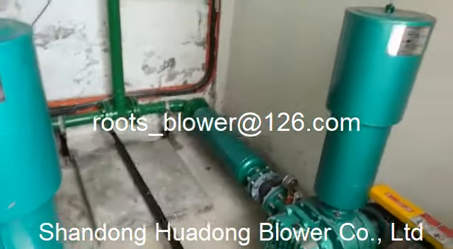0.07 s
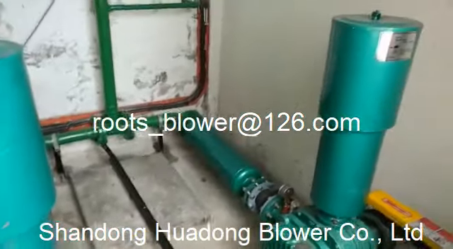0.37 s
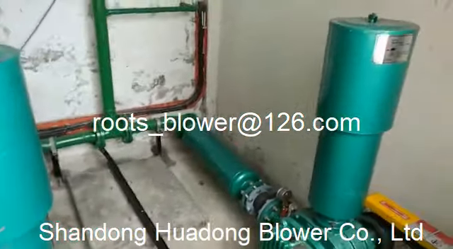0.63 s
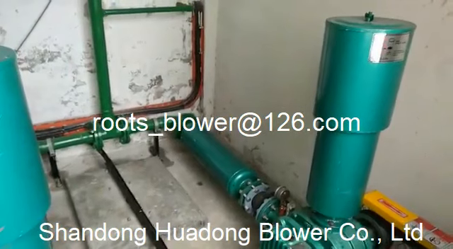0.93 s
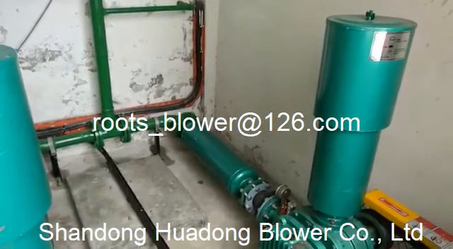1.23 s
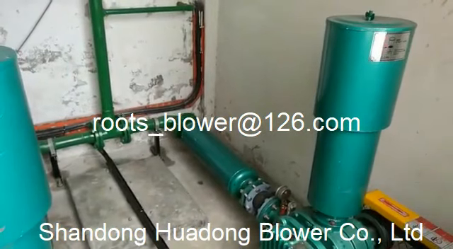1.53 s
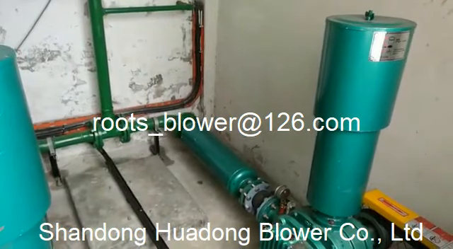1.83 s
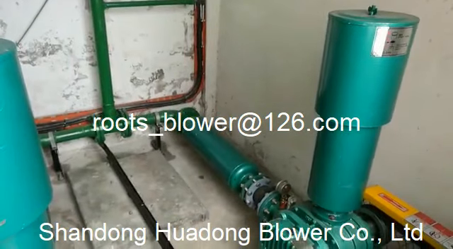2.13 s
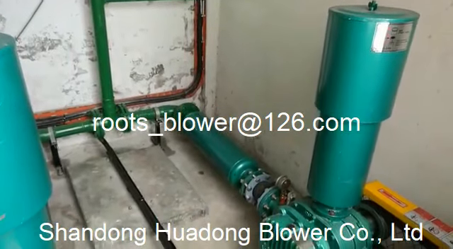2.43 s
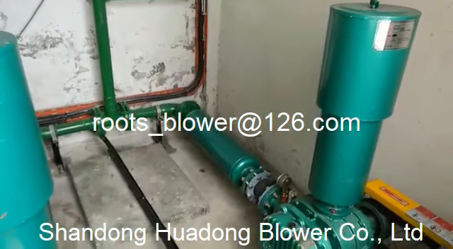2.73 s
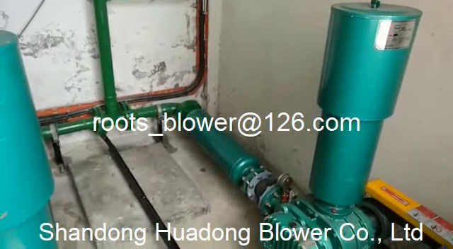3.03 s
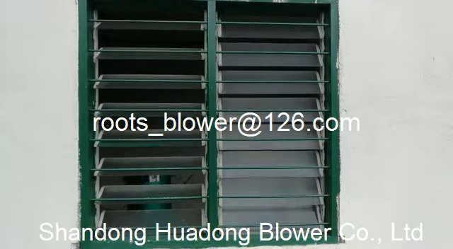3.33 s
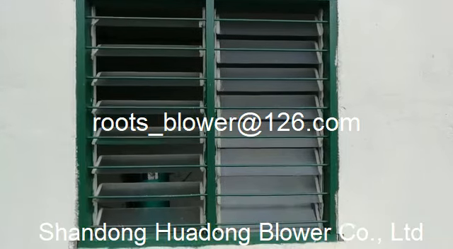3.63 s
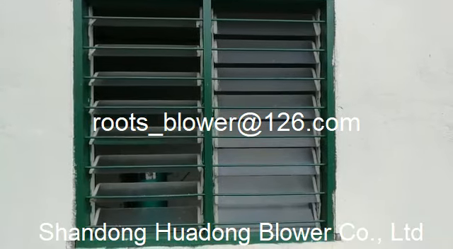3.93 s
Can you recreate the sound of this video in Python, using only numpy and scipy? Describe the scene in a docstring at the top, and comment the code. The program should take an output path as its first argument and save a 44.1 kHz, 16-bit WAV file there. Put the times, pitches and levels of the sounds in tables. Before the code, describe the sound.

Loud, steady industrial blower drone with gear whine, suddenly fainter when heard through a window.

```python
"""A three-lobe rotary air blower drones at constant speed in a concrete plant room.
Six puffs of air a turn form a periodic pressure wave, heard as the drone. The meshing timing gears
whine, modulated by the drive belt; the motor hums, the casing rattles alike on every turn, and air
rushes in the pipes. The machine is heard first from close by, then abruptly from outside a louvred
window, where it is far quieter."""
import sys
import numpy as np
from scipy import signal
from scipy.fft import irfft
from scipy.io import wavfile
from scipy.ndimage import uniform_filter1d

SR = 44100
rng = np.random.default_rng(int(sys.argv[2]) if len(sys.argv) > 2 else 0)


def transcribe(signal):
    """Save signal, clipped to [-1, 1], as a 16-bit WAV file at the path in sys.argv[1]."""
    frames = np.atleast_2d(signal).T
    limited = np.clip(frames, -1, 1)
    pcm = np.round(limited * 32767).astype(np.int16)
    wavfile.write(sys.argv[1], SR, pcm)


N = 176400

# Partials of the air pulsation, in the room and through the window:
# shaft multiple, left level/dB, right level/dB, interaural correlation (-1..1)
PUFF_PARTIALS_INSIDE = [(3, -34.0, -33.5, 0.99), (6, -22.0, -21.5, 0.96), (7, -45.0, -46.5, 0.75),
                        (8, -41.5, -41.5, 0.92), (9, -43.5, -42.5, 0.77), (10, -45.5, -45.0, 0.81),
                        (11, -45.0, -46.5, 0.68), (12, -30.5, -29.5, 0.56), (18, -45.5, -48.0, -0.2),
                        (24, -40.0, -47.5, -0.43), (27, -43.0, -58.5, 0.46), (30, -47.0, -44.5, 0.48),
                        (33, -46.0, -45.5, -0.25), (36, -33.5, -38.0, 0.42), (39, -47.5, -36.0, -0.83),
                        (42, -32.0, -31.5, -0.65), (45, -34.0, -36.5, -0.8), (48, -31.5, -30.0, -0.49),
                        (51, -36.0, -44.0, -0.95), (54, -37.5, -40.0, 0.93), (60, -42.5, -47.5, -0.84),
                        (63, -51.0, -42.5, -0.44), (69, -48.0, -44.0, -0.2)]
PUFF_PARTIALS_OUTSIDE = [(3, -53, -53, 1.0), (6, -40, -39.5, 0.98), (9, -53, -52, 0.99),
                         (10, -58, -58.5, 0.97), (12, -52.0, -50.0, 0.98), (24, -54.0, -57.5, 0.53),
                         (30, -54, -54.5, 0.77), (39, -54.5, -53.0, 0.77), (42, -52.5, -51.0, -0.64),
                         (45, -54, -49.5, 0.89), (48, -39.3, -37.3, 0.98), (54, -47.5, -53.0, 0.91),
                         (57, -51.5, -51, 0.97)]
# Mesh tones and sidebands of the timing gears, in the room and through the window: same columns
GEAR_PARTIALS_INSIDE = [(57, -33.0, -46.0, 0.68), (103, -35.5, -33.5, 0.35), (105, -27.0, -27.5, 0.72),
                        (106, -36.0, -38.5, -0.84), (108, -38.0, -39.5, 0.94), (109, -45.5, -37.5, 0.54),
                        (110, -38.0, -35.5, 0.39), (112, -34.5, -30.5, -0.26), (113, -27.0, -27.0, -0.04),
                        (114, -22.0, -23.0, -0.86), (115, -23.5, -22.5, -0.96), (116, -29.5, -32.0, 0.83),
                        (117, -33.0, -32.5, -0.2), (118, -44.0, -36.5, -0.31), (119, -35.5, -38.0, -0.63),
                        (120, -39.5, -41.5, -0.14), (123, -41.0, -32.5, 0.73), (124, -37.5, -36.0, -0.03),
                        (125, -45.0, -32.0, -0.12), (128, -46.0, -37.0, 0.36), (148, -42.5, -43, 0.4),
                        (150, -41.5, -41, 0.4), (153, -44.0, -42.0, 0.86), (155, -43.0, -36.5, 0.82),
                        (160, -47.0, -33.5, -0.18), (168, -42, -46, -0.1), (169, -41.0, -47.5, 0.72),
                        (171, -32.5, -38.5, -0.96)]
GEAR_PARTIALS_OUTSIDE = [(103, -46.0, -51.0, -0.31), (105, -43.0, -56.0, 0.47), (106, -46.0, -53.5, 0.16),
                         (107, -50, -65, 0.1), (112, -49.0, -52.0, -0.44), (113, -46.5, -51.0, 0.52),
                         (114, -47.0, -50.5, 0.56), (115, -38.5, -44.5, -0.67), (116, -47.0, -52.5, 0.97),
                         (123, -45.0, -50.5, -0.2), (128, -52.5, -56.5, -0.17)]
# Slow rise and fall of the gear whine in the room: t/s, gain/dB
WHINE_ENVELOPE = [(0.0, -0.5), (1.6, 0.2), (3.16, -0.97)]
# Motor hum and whine: f/Hz, level/dB
MOTOR_TONES = [(300.3, -42.5), (679.3, -52), (866.3, -44.5)]
# Spectral envelope of the casing's shaft harmonics: f/Hz, inside level/dB, outside level/dB
RATTLE_SPECTRUM = [(45, -62, -66.0), (110, -48, -61), (335, -56.5, -77), (553, -80, -65.5),
                   (770, -55, -64.5), (1130, -52.5, -63), (1586, -49, -64), (1944, -58.5, -73),
                   (2240, -45, -63), (2540, -65, -56), (3070, -54, -61.5), (3290, -50, -71),
                   (3380, -46.5, -59), (3790, -57, -63.5), (3820, -49, -59), (4110, -55.5, -78),
                   (4600, -70, -84), (5190, -60.5, -74.5), (5540, -75, -88), (6500, -67, -81.5),
                   (7350, -80, -96)]
# Spectral density of the rushing air: f/Hz, inside level/dB, outside level/dB (in a 1 Hz band)
AIR_SPECTRUM = [(15, -85, -85), (45, -65, -68), (62, -67, -80), (77, -60, -60), (100, -68, -73),
                (120, -61, -69), (217, -64.5, -75), (416, -71.5, -77), (637, -74, -78.5),
                (785, -61.5, -77.5), (1190, -65, -71.5), (1970, -68, -83.5), (2390, -61, -68),
                (2720, -53, -86), (2900, -58.5, -75), (3130, -60.5, -84), (3670, -59.5, -75),
                (3630, -65.5, -87), (4500, -76.5, -95), (5300, -72.5, -89.5), (5560, -77, -93.5),
                (7300, -80.5, -97.5), (9700, -82.5, -97), (15000, -82.5, -101.5)]
# Likeness of the two ears in the diffuse field: f/Hz, coherence (0..1)
EAR_COHERENCE = [(60, 0.9), (180, 0.94), (350, 0.33), (700, 0.1), (2500, .02)]
# Left minus right for air and rattle: f/Hz, inside balance/dB, outside balance/dB
EAR_BALANCE = [(200, -2, 2.5), (1220, -0.5, 0), (2560, 3.5, 0.5), (4200, 3, 5), (8000, 1.5, -1),
               (15000, 2.5, 6)]
# Overall gain outside, stepping up a little near the end: t/s, gain/dB
OUTSIDE_ENVELOPE = [(3.17, 0.5), (3.80, 0.1), (3.83, 2.6), (4.0, 2.5)]

INSIDE, OUTSIDE = 0, 1  # index into each pair of settings
OUTSIDE_FROM_S, TOP_HZ = 3.162, 15750
SHAFT_HZ, SHAFT_WANDER_TURNS, PUFFS_PER_TURN = 22.593, 0.00028, 6
BELT_HZ = 10.0  # laps of the drive belt per second
SWEEP_TURNS = 0.125  # group delay per shaft multiple: the whine surges and sweeps upward once a turn
SWAY_DB_PER_KHZ, SWAY_HZ = 0.6, 1.57  # tones swell as the microphone sways through standing waves
PUFF_DB, RATTLE_DB, AIR_DB = (-0.02, 0.4), (-0.35, 0.3), (-1, -1.1)  # gains on the tabulated levels
GEARS_OUTSIDE_DB = -0.5
PUFF_WAVER, GEAR_WAVER, RATTLE_WAVER = (0.0078, 0.097), 0.081, 0.36  # share of each tone that wanders


def lobe_drone(t, turns, place):
    """Periodic displacement: the lobes expel air in puffs, six to each turn of the shaft."""
    partials = (PUFF_PARTIALS_INSIDE, PUFF_PARTIALS_OUTSIDE)[place]
    drone = shaft_tones(partials, t, turns, PUFF_WAVER[place], waver_hz=12, belt_depth=0.028)
    return undb(PUFF_DB[place]) * drone


def gear_whine(partials, t, turns):
    """Gear meshing: mesh tones and sidebands interfere, so that the whine pulses once a turn."""
    return shaft_tones(partials, t, turns, GEAR_WAVER, waver_hz=17, belt_depth=0.2, scatter_cycles=0.3)


def shaft_tones(partials, t, turns, waver, waver_hz, belt_depth, scatter_cycles=1):
    """Modulation: each lap of the belt flutters the phase and amplitude of wavering shaft harmonics."""
    out = np.zeros((2, len(t)))
    for multiple, left_db, right_db, correlation in partials:
        cycles = multiple * (turns - SWEEP_TURNS * multiple / 2) + scatter_cycles * rng.random()
        belt_angle = 2 * np.pi * (BELT_HZ * t + rng.random((2, 1)))
        belt_tug, belt_swell = belt_depth * np.cos(belt_angle)
        phase = 2 * np.pi * cycles + waver * drift(t, waver_hz) + belt_tug
        sway_db = SWAY_DB_PER_KHZ * multiple * SHAFT_HZ / 1000 * drift(t, SWAY_HZ)
        amplitude = np.sqrt(2) * (1 + waver * drift(t, waver_hz) + belt_swell) * undb(sway_db)
        # standing waves give each ear its own level and phase
        out[0] += undb(left_db) * amplitude * np.cos(phase)
        out[1] += undb(right_db) * amplitude * np.cos(phase - np.arccos(correlation))
    return out


def motor_hum(t):
    """Beating: of three steady motor tones, the middle one beats slowly against a puff overtone."""
    return sum(undb(db) * np.sqrt(2) * np.sin(2 * np.pi * (hz * t + rng.random()))
               for hz, db in MOTOR_TONES)


def casing_rattle(t, turns, place, strong_partials, size=8192, count=340):
    """Fourier series: clatter repeating each turn fills the shaft harmonics between the strong tones."""
    multiples = np.arange(count)
    hz = multiples * SHAFT_HZ
    between = (multiples > 1) & ~np.isin(multiples, [row[0] for row in strong_partials])
    scatter_db = 3 * rng.standard_normal(count)
    gain = between * undb(read_curve(RATTLE_SPECTRUM, hz, 1 + place) + RATTLE_DB[place] + scatter_db)

    def clatter():
        one_turn = irfft(gain * diffuse_field(hz, place), size) * size / np.sqrt(2)
        return np.array([np.interp(turns % 1 * size, np.arange(size), ear) for ear in one_turn])
    changing = sum(clatter() * drift(t, rate_hz=7.85) for _ in range(2))
    return (clatter() + RATTLE_WAVER * changing) / np.sqrt(1 + 2 * RATTLE_WAVER ** 2)


def rushing_air(t, turns, place, puff_depth=0.075, turn_depth=0.065, flicker_db=0.7):
    """Flow noise: coloured by pipes and casing, it throbs in amplitude with each puff and each turn."""
    hz = np.arange(N // 2 + 1) * SR / N
    gain = undb(read_curve(AIR_SPECTRUM, hz, 1 + place) + AIR_DB[place])
    rush = irfft(gain * diffuse_field(hz, place), N)[:, :len(t)] * np.sqrt(N * SR / 2)
    shaft_angle = 2 * np.pi * turns
    throb = 1 + puff_depth * np.cos(PUFFS_PER_TURN * shaft_angle) + turn_depth * np.cos(shaft_angle)
    return rush * throb * undb(flicker_db * drift(t, rate_hz=14))


def diffuse_field(hz, place):
    """Interaural coherence: random phases, alike at both ears in the bass, unrelated in the treble."""
    phase = rng.uniform(0, 2 * np.pi, len(hz))
    coherence = np.clip(read_curve(EAR_COHERENCE, hz, 1), 1e-3, 1)
    phase_gap = np.sqrt(-2 * np.log(coherence)) * rng.standard_normal(len(hz))
    ears = np.array([[.5], [-.5]])
    return np.exp(1j * (phase + ears * phase_gap)) * undb(ears * read_curve(EAR_BALANCE, hz, 1 + place))


def drift(t, rate_hz, size=32):
    """Low-pass noise: random steps smoothed into a drift of unit standard deviation."""
    steps = np.repeat(rng.standard_normal(256), size)
    smooth = uniform_filter1d(uniform_filter1d(steps, size), size)
    return np.interp(t * (rate_hz * size), np.arange(len(smooth)), smooth / smooth.std())


def read_curve(table, hz, column):
    """Interpolation of one table column on a logarithmic frequency scale."""
    rows = np.array(table, float)
    return np.interp(np.log(np.maximum(hz, 1)), np.log(rows[:, 0]), rows[:, column])


def undb(db):
    """Decibels to amplitude ratio."""
    return np.exp(np.asarray(db) * np.log(10) / 20)


def plant_room(t, turns):
    """Superposition: beside the machine, drone, whine, hum, rattle and air add as pressures."""
    drone = lobe_drone(t, turns, INSIDE)
    whine_db = np.interp(t, *np.array(WHINE_ENVELOPE).T)
    whine = undb(whine_db) * gear_whine(GEAR_PARTIALS_INSIDE, t, turns)
    hum = motor_hum(t)
    rattle = casing_rattle(t, turns, INSIDE, PUFF_PARTIALS_INSIDE + GEAR_PARTIALS_INSIDE)
    return drone + whine + hum + rattle + rushing_air(t, turns, INSIDE)


def outside_louvres(t, turns):
    """Transmission loss: the blower is fainter, the motor unheard; one whistling overtone stands out."""
    drone = lobe_drone(t, turns, OUTSIDE)
    whine = undb(GEARS_OUTSIDE_DB) * gear_whine(GEAR_PARTIALS_OUTSIDE, t, turns)
    rattle = casing_rattle(t, turns, OUTSIDE, PUFF_PARTIALS_OUTSIDE + GEAR_PARTIALS_OUTSIDE)
    gain = undb(np.interp(t, *np.array(OUTSIDE_ENVELOPE).T))
    return gain * (drone + whine + rattle + rushing_air(t, turns, OUTSIDE))


def scene():
    """Phase locking: the same turning shaft times the sound in the room, then outside."""
    t = np.arange(N) / SR
    turns = SHAFT_HZ * t + SHAFT_WANDER_TURNS * drift(t, rate_hz=2.7)
    inside = t < OUTSIDE_FROM_S
    fade = np.clip((OUTSIDE_FROM_S - t[inside]) / 0.0023, 0, 1)
    room = fade * plant_room(t[inside], turns[inside])
    return np.hstack([room, outside_louvres(t[~inside], turns[~inside])])


def record(dry):
    """Band limiting: a steep elliptic low-pass filter removes the highest treble."""
    return signal.sosfilt(signal.ellip(10, .1, 80, TOP_HZ, fs=SR, output="sos"), dry)


dry = scene()
out = record(dry)
transcribe(out)
```